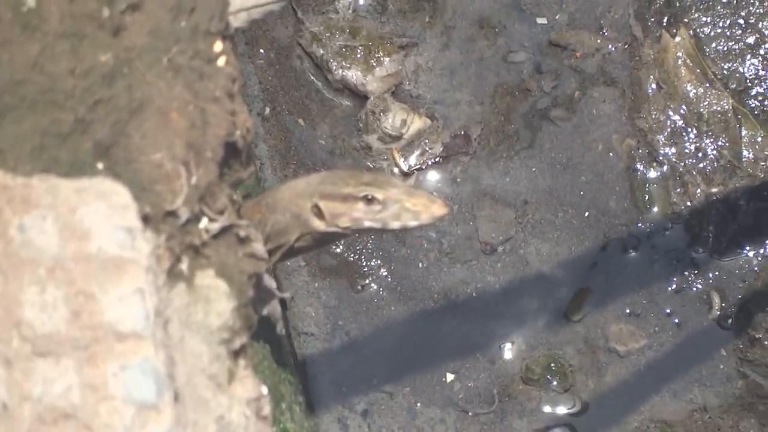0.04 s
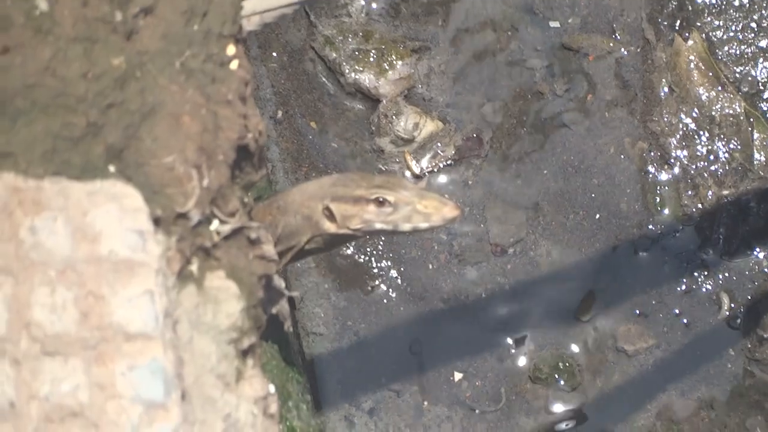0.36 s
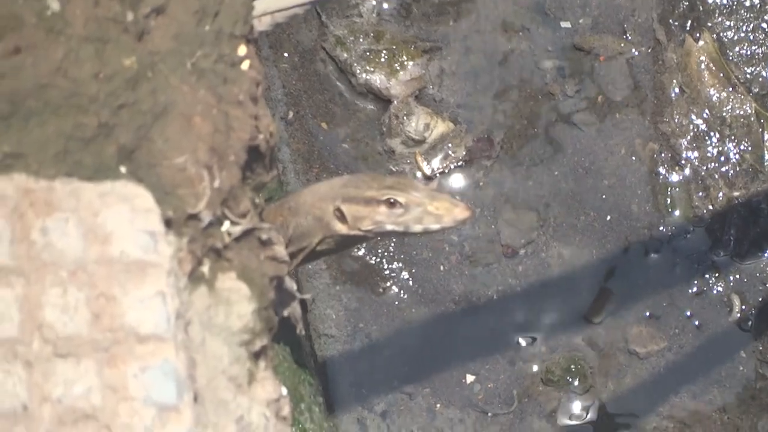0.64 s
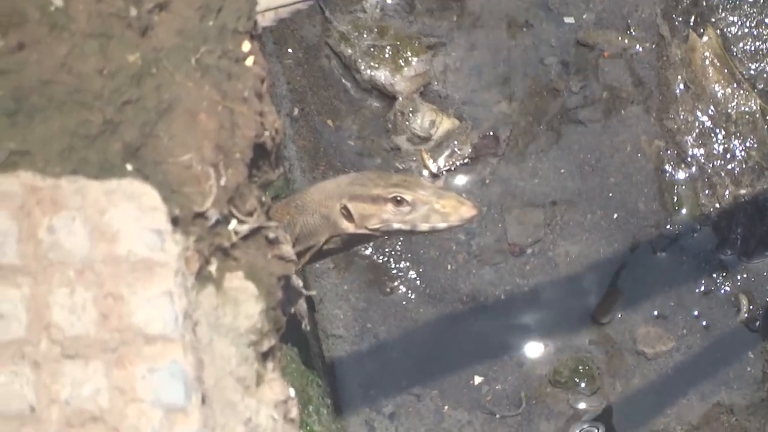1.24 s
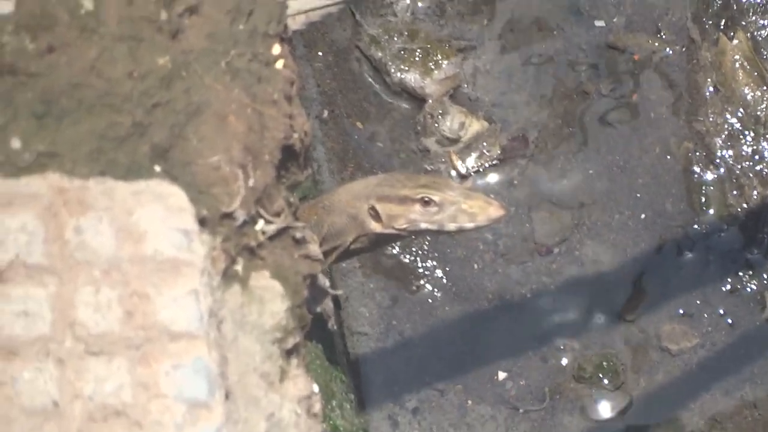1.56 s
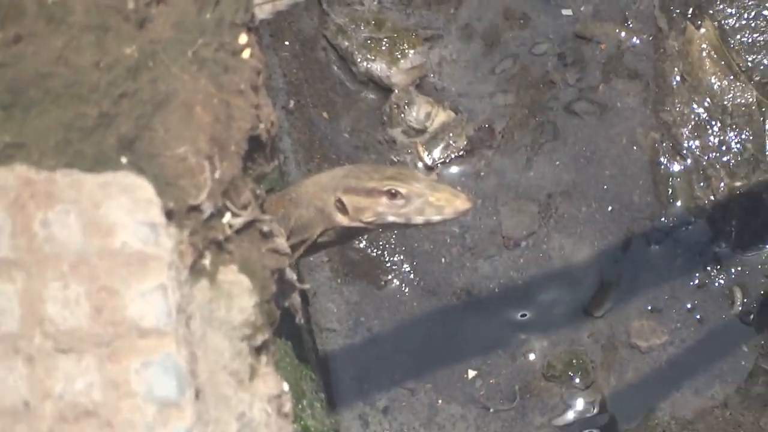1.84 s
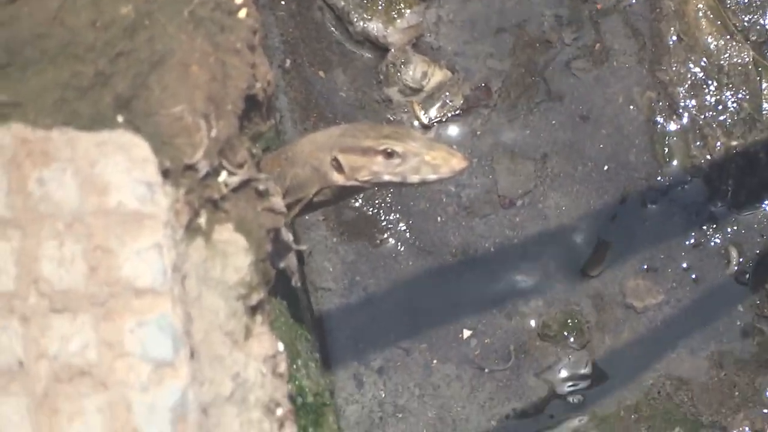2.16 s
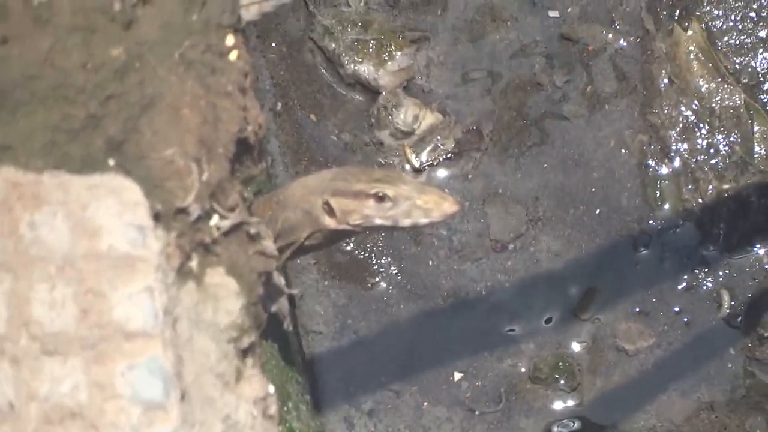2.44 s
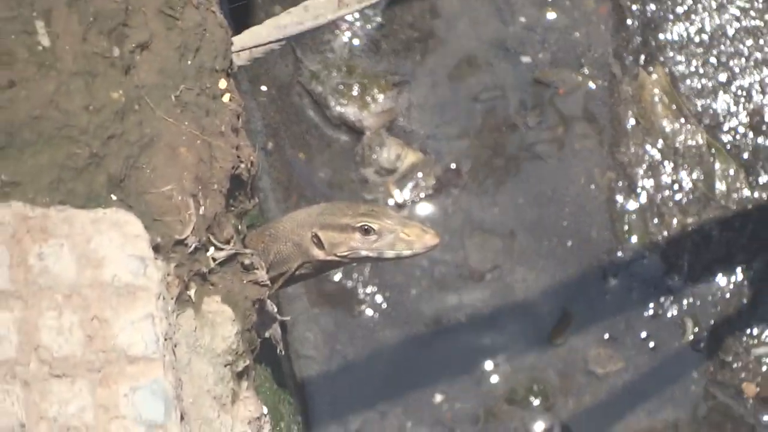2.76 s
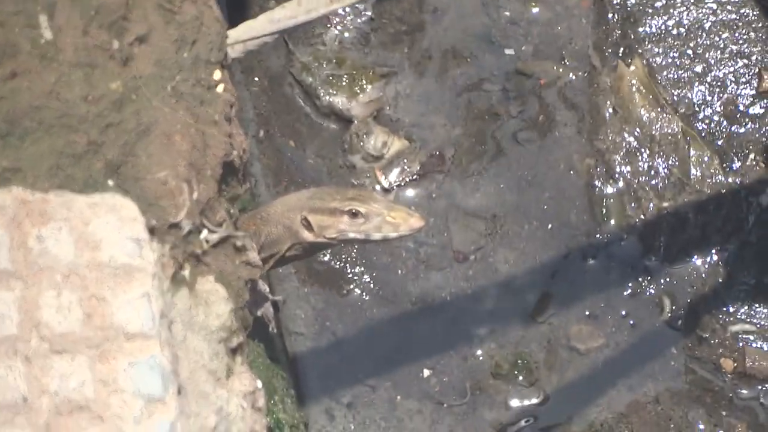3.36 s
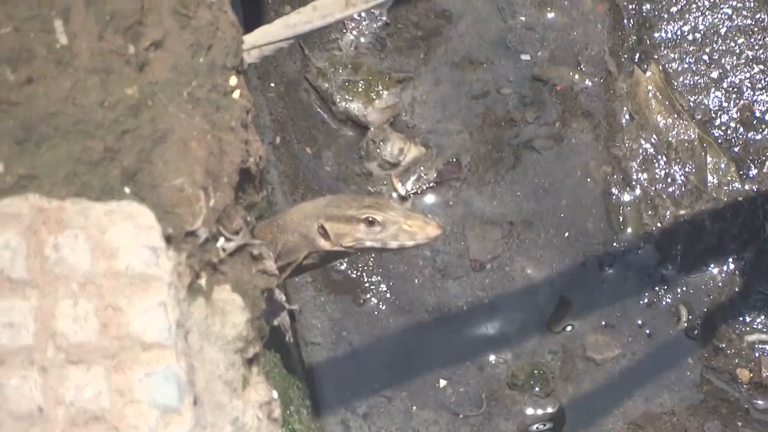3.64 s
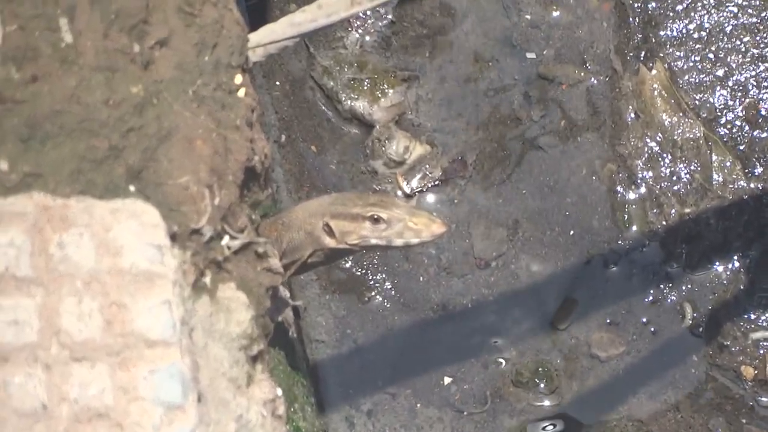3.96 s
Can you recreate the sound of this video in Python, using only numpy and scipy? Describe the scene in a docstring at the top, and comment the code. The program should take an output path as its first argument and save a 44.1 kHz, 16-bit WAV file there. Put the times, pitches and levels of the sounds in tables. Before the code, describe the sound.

A vehicle passes a wet roadside ditch, its tyre roar, hiss and low rumble swelling and then fading. Close to the microphone, tiny bubbles tick and water trickles, with distant traffic and a faint shrill whine behind.

```python
"""A vehicle rushes past a wet roadside ditch. Its tyre roar and hiss swell first, the low rumble
swells later and dies away sooner, and a thin high sizzle trails it: all are shaped noise.
Close by, water ticks and trickles as tiny bubbles burst and droplets land. A bird starts a chirp
at the very end. Behind it all lie the tyre noise of distant traffic and a shrill, wavering whine."""
import sys
import numpy as np
from scipy import signal
from scipy.fft import rfft, irfft
from scipy.io import wavfile

SR = 44100
rng = np.random.default_rng(int(sys.argv[2]) if len(sys.argv) > 2 else 0)


def generate_wav(signal):
    """Clip the signal to [-1, 1] and save it as 16-bit WAV at the path in sys.argv[1]."""
    frames = np.transpose(np.atleast_2d(signal))
    scaled = np.clip(frames, -1, 1) * 32767
    pcm = np.round(scaled).astype(np.int16)
    wavfile.write(sys.argv[1], SR, pcm)


N = 176400
T = np.arange(N) / SR
FREQS = np.maximum(np.arange(N // 2 + 1) * SR / N, 1)

# How loud the vehicle is as it passes: time_s, roar_db, body_db, hiss_db
PASS_LEVELS = [(1.33,-64,-82,-75),(1.45,-51,-61.5,-57),(1.58,-44,-50.5,-52.5),(1.74,-46,-53,-57),(1.87,-41.5,-49.5,-47),(2.1,-37,-42.5,-44.5),(2.39,-38.5,-42.5,-47),(2.53,-43.5,-46.5,-51.5),(2.96,-55.5,-55,-59.5),(3.16,-54.5,-53.5,-58.5),(3.45,-51,-52.5,-59.5),(3.72,-56.5,-61.5,-63),(4,-58.5,-69,-63)]
# Tone of the vehicle's rush: frequency_hz, level_db
RUSH_TONE = [(35, -64), (60, -32), (107, -28.5), (135, -17), (187, -12), (253, -6), (298, -7), (368, -3.5),
             (443, -5), (627, 0.5), (869, -3), (931, 0.5), (1050, -3), (1150, 1), (1290, -3.5), (1590, 1.5),
             (1910, -5), (2100, -3.5), (2360, -7.5), (2710, -7), (3190, -7.5), (3930, -11.5), (4850, -13.5),
             (7200, -19), (15500, -64.5)]
# Hollow notes that swell in the rush: peak_s, rise_s, fall_s, pitch_hz, width_hz, level_db
HOLLOW_NOTES = [(1.622,0.14,0.2,1427,157.4,-49.5),(2.25,0.23,0.26,640,96,-51),(2.18,.25,.2,1663,216,-55),(2.27,0.44,0.49,3137,203.7,-53),(3.12,.12,0.066,2920,130,-58),(3.14,.025,.025,520,350,-53.5),(3.34,0.05,0.053,560,340,-51)]
# Tone of the trailing sizzle: frequency_hz, level_db
SIZZLE_TONE = [(7800,-18),(8200,0),(8550,3.5),(8950,-5),(9300,0),(9700,-15),(10100,-6),(10450,-15),(10900,-9),(11700,-8),(12300,-25),(12800,-18),(15500,-33)]
# Tiny bubbles that tick: start_s, level_db, pitch_hz, splash_share_db
TINY_BUBBLES = [(0.0486, -36.5, 6760, -26), (0.082, -40, 7380, -25), (0.2082, -41.5, 6660, -16),
                (0.2423, -48.5, 6660, -7), (0.5202, -42.5, 7600, -23), (0.698, -41, 7610, -22),
                (0.8111, -46, 7630, -15), (0.9263, -37.5, 6700, -20), (0.961, -45, 6230, -12.5),
                (1.1486, -46, 5970, -11), (1.3806, -39.5, 6700, -14.5), (1.5532, -36, 5970, -26),
                (1.6435, -41, 5910, -10), (1.8462, -30, 5660, -23), (2.37, -34, 7610, -24),
                (2.6612, -27, 6100, -34.5), (2.9854, -37, 8600, -16), (3.2966, -28.5, 7090, -32),
                (3.4443, -37, 7060, -13), (3.63, -38, 7260, -12.5), (3.681, -31.5, 7460, -20),
                (3.8152, -39, 7410, -17), (3.8998, -43, 7470, -12), (3.9677, -33, 7510, -23)]
# Larger bubbles that plink: start_s, level_db, pitch_hz
LARGER_BUBBLES = [(0.6026, -36.5, 3940), (1.2528, -34, 3630), (2.8022, -31.5, 4600)]
# Tone of splashing water: frequency_hz, level_db
SPLASH_TONE = [(2500,-30),(5000,-6),(6200,2),(7800,0.5),(8900,-5),(11300,-9),(12400,-19),(15500,-23)]
# Where three droplet sizes crackle: pitch_hz, half_width_hz
DROPLET_BANDS = [(6700,2100),(7700,1500),(11000,3700)]
# How loud the trickle is: time_s, level_db
TRICKLE_LEVELS = [(0,-68),(1.2,-75.5),(2.6,-59),(3.3,-68),(3.75,-61.5),(4,-62)]
# Tone of distant traffic: frequency_hz, level_db
TRAFFIC_TONE = [(40,-44),(100,-25.5),(250,-19),(450,-14.5),(700,-6.5),(860,-10.5),(1080,0),(1300,1),(1700,-3),(1950,-6),(2500,-7.5),(3200,-5.5),(4000,-13),(5200,-18),(6500,-16),(8200,-20.5),(8900,-28.5),(11000,-29),(12300,-37),(15500,-41)]
# How loud that traffic is: time_s, level_db
TRAFFIC_LEVELS = [(0,-55.5),(.65,-58.5),(.95,-54),(1.3,-55.5),(3,-54),(4,-56)]
# When the whine sounds: start_s, end_s, fade_in_s, fade_out_s, pitch_hz, level_db
WHINE_SPELLS = [(-.35,1.34,.55,0.63,2999,-61.5),(2.998,4.46,.55,0.53,3087,-53.5)]
# The three notes in the whine: pitch_ratio, level_db
WHINE_NOTES = [(1,1),(0.97,-8),(.887,-8)]
# How far noise spreads to the sides: frequency_hz, side_db
STEREO_WIDTH = [(40,-12),(120,-41),(250,-29),(500,-19.5),(1100,-16.5),(2200,-12.5),(4500,-18.5),(8000,-16),(15000,-12)]
# Balance between the ears: frequency_hz, left_minus_right_db
BALANCE = [(150,0),(700,-.9),(2500,-1.1),(5000,-.4),(9000,-.8)]


def vehicle():
    """Rumble, body noise, tyre roar and hiss swell and flutter, with hollow notes on top."""
    rumble_top_hz, body_top_hz, roar_top_hz = 309, 936, 3900
    roar_db, body_db, hiss_db = (curve(PASS_LEVELS, column) for column in (1, 2, 3))
    # The rumble swells more steeply than the body noise and fades away from the loudest moment.
    peak_db, from_peak_s = body_db.max(), np.abs(T - T[body_db.argmax()])
    rumble_db = peak_db - 9.5 + 1.41 * (body_db - peak_db) - 3.5 * from_peak_s
    bands = [(below(rumble_top_hz), rumble_db),
             (above(rumble_top_hz) * below(body_top_hz), body_db),
             (above(body_top_hz) * below(roar_top_hz), roar_db),
             (above(roar_top_hz), hiss_db)]
    rush = sum(noise(tone(RUSH_TONE) * band) * gain(db + .5 * wander(18.5)) for band, db in bands)
    fade_in = np.clip((T - PASS_LEVELS[0][0]) / 0.11 + 1, 0, 1)
    rush *= fade_in
    for peak_s, rise_s, fall_s, hz, width_hz, db in HOLLOW_NOTES:
        rush += noise(around(hz, width_hz / 2)) * swell(peak_s, rise_s, fall_s) * gain(db)
    return rush


def sizzle():
    """A thin, ringing high hiss trails the vehicle."""
    hiss = noise(tone(SIZZLE_TONE) * above(7700))
    return hiss * swell(peak_s=2.796, rise_s=0.14, fall_s=0.18) * gain(-59.5)


def bubbles():
    """Tiny bubbles burst with a splash and a short ring; larger ones plink lower and longer."""
    rings, bursts = np.zeros(N), np.zeros(N)
    for start_s, db, hz, splash_share_db in TINY_BUBBLES:
        rings += gain(db - 5) * ring(start_s, hz, decay_s=0.00084)
        bursts += gain(db + splash_share_db + 13.5) * burst(start_s)
    for start_s, db, hz in LARGER_BUBBLES:
        rings += gain(db - 5.5) * ring(start_s, hz, decay_s=0.0017)
        bursts += gain(db - 9.5) * burst(start_s)
    splashes = bursts * rng.standard_normal(N)
    return irfft(rfft(rings) * above(3700) + rfft(splashes) * tone(SPLASH_TONE), N)


def trickle():
    """Many droplets of random strength land, each size crackling around its own pitch."""
    drops_per_s, scatter_db, decay_s = 90, 4.5, 0.00077  # for each size
    spectrum = 0
    for hz, half_width_hz in DROPLET_BANDS:
        strengths = gain(scatter_db * np.minimum(rng.exponential(size=N), 3.2))
        drops = (rng.random(N) < drops_per_s / SR) * strengths
        fading_drops = signal.lfilter([1], [1, -np.exp(-1 / (decay_s * SR))], drops)
        patter = fading_drops * rng.standard_normal(N)
        spectrum += rfft(patter) * around(hz, half_width_hz)
    return normalise(irfft(spectrum * tone(SPLASH_TONE), N)) * gain(curve(TRICKLE_LEVELS))


def bird():
    """A bird gives one faint rising whistle."""
    start_s, length_s = 3.935, .065
    progress = np.clip((T - start_s) / length_s, 0, 1)
    pitch_hz = 4950 + 650 * progress ** 2
    return whistle(pitch_hz) * progress * gain(-56.5)


def traffic():
    """Steady tyre noise comes from further up the road."""
    return noise(tone(TRAFFIC_TONE)) * gain(curve(TRAFFIC_LEVELS) + 0.68 * wander(13))


def whine():
    """Three shrill, fluttering notes, like a distant brake squeal, with one brief flare."""
    flare_hz = 3170
    flare = np.sqrt(2) * np.sin(2 * np.pi * flare_hz * T)
    sound = flare * swell(peak_s=3.657, rise_s=0.013, fall_s=0.0065) * gain(-42.5)
    for start_s, end_s, fade_in_s, fade_out_s, hz, db in WHINE_SPELLS:
        fade = np.clip(np.minimum((T - start_s) / fade_in_s, (end_s - T) / fade_out_s), 0, 1)
        for ratio, note_db in WHINE_NOTES:
            pitch_hz = hz * ratio + 13.6 * wander(40)
            flutter_db = 3.5 * wander(51)
            note = normalise(whistle(pitch_hz) * gain(flutter_db))
            rasp = noise(around(hz * ratio, half_width_hz=55)) * gain(-4.5)
            sound = sound + (note + rasp) * fade * gain(db + note_db)
    return sound


def gain(db):
    """Turn decibels into a number to multiply by."""
    return 10 ** (np.asarray(db) / 20)


def normalise(x):
    """Scale a signal to an average strength (rms) of 1."""
    return x / np.sqrt(np.mean(x ** 2) + 1e-30)


def curve(rows, column=1):
    """Join a table column's values with straight lines over time."""
    rows = np.array(rows)
    return np.interp(T, rows[:, 0], rows[:, column])


def tone(points):
    """A filter drawn through (frequency_hz, level_db) points."""
    hz, db = np.array(points).T
    return gain(np.interp(np.log(FREQS), np.log(hz), db))


def above(hz):
    """A filter that keeps what is higher than hz."""
    return 1 / np.sqrt(1 + (hz / FREQS) ** 12)


def below(hz):
    """A filter that keeps what is lower than hz."""
    return 1 / np.sqrt(1 + (FREQS / hz) ** 12)


def around(hz, half_width_hz):
    """A filter that keeps what is close to hz."""
    return above(hz / 2) / (1 + ((FREQS - hz) / half_width_hz) ** 2)


def noise(shape):
    """Filtered stereo noise that sits near the centre."""
    middle, side = rfft(rng.standard_normal((2, N))) * shape
    side = side * tone(STEREO_WIDTH)
    return normalise(irfft(np.array([middle + side, middle - side]), N))


def wander(rate_hz):
    """A smooth random wobble, up to about rate_hz fast."""
    return normalise(irfft(rfft(rng.standard_normal(N)) * below(rate_hz) * (FREQS > 1), N))


def swell(peak_s, rise_s, fall_s):
    """Loudness that rises and falls in a bell shape."""
    return np.exp(-((T - peak_s) / np.where(T < peak_s, rise_s, fall_s)) ** 2 / 2)


def burst(start_s, decay_s=0.0017):
    """Loudness that jumps up and dies away."""
    return (T >= start_s) * np.exp(-np.abs(T - start_s) / decay_s)


def ring(start_s, hz, decay_s):
    """A pure note that starts suddenly and dies away."""
    age_s = np.clip(T - start_s, 0, .05)
    return np.sin(2 * np.pi * hz * age_s) * np.exp(-age_s / decay_s)


def whistle(pitch_hz):
    """A pure note that follows a changing pitch."""
    return np.sin(2 * np.pi * np.cumsum(pitch_hz) / SR)


def scene():
    """Everything sits near the centre; above the bass it leans a touch to the right."""
    mix = vehicle() + sizzle() + traffic() + whine() + bubbles() + trickle() + bird()
    lean = np.sqrt(tone(BALANCE))
    return irfft(rfft(mix) * np.array([lean, 1 / lean]), N)


def record(dry):
    """Cut away the very highest treble."""
    top_hz = 15550
    return signal.sosfilt(signal.ellip(10, .1, 70, top_hz, fs=SR, output="sos"), dry)


dry = scene()
out = record(dry)
generate_wav(out)
```